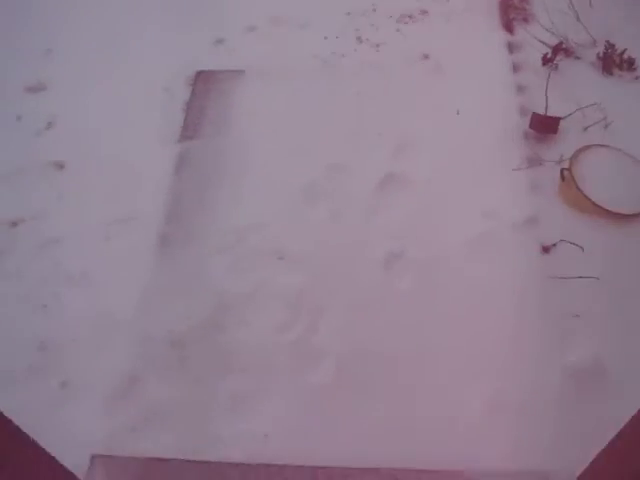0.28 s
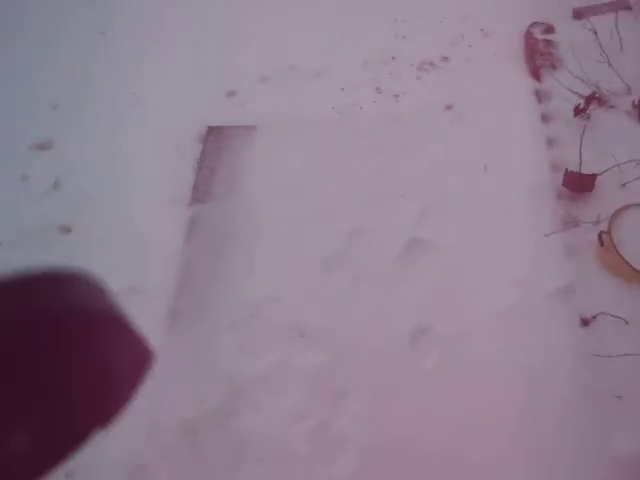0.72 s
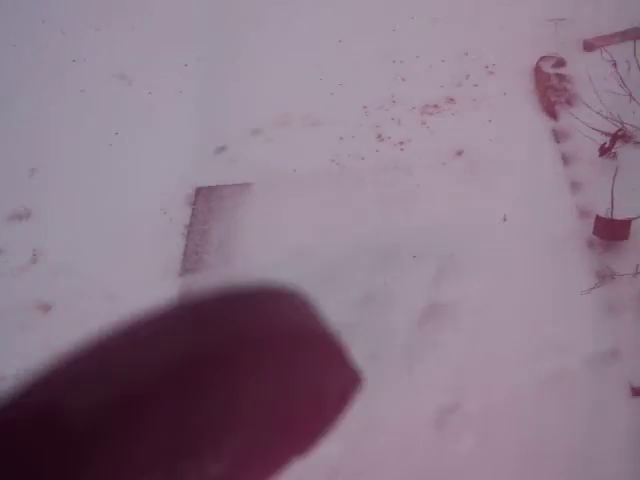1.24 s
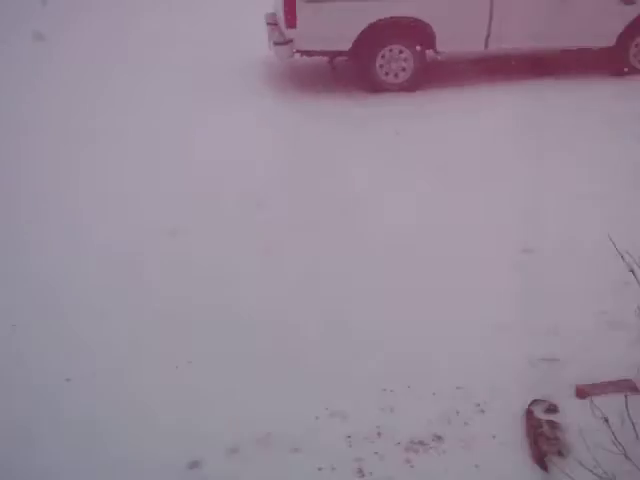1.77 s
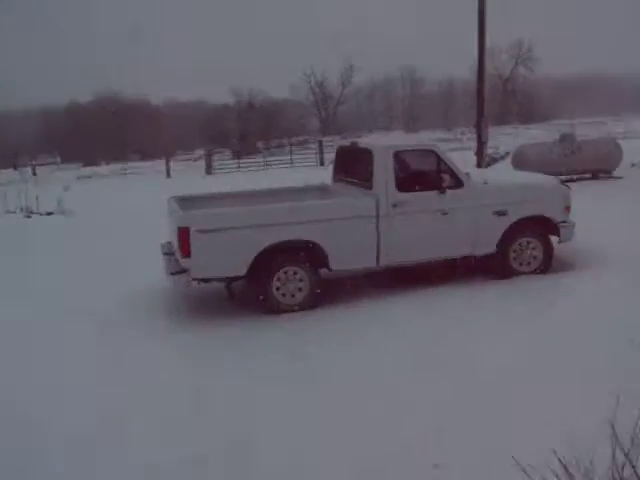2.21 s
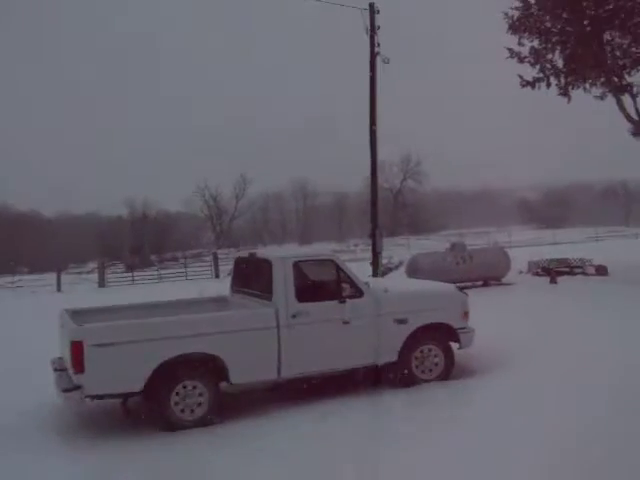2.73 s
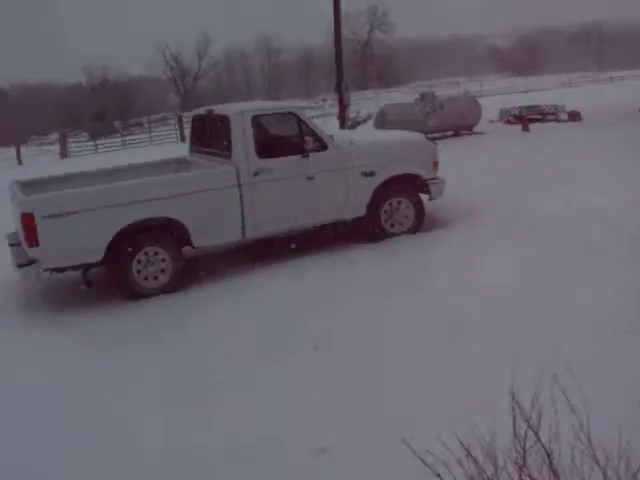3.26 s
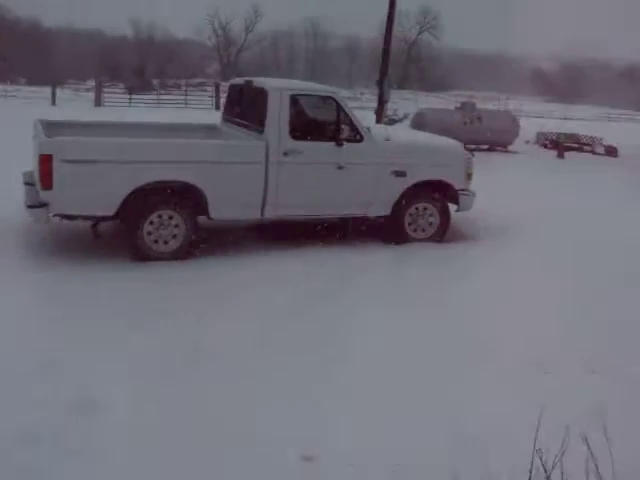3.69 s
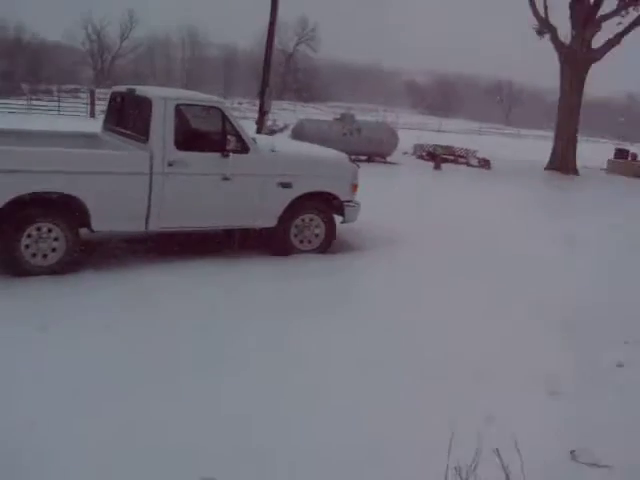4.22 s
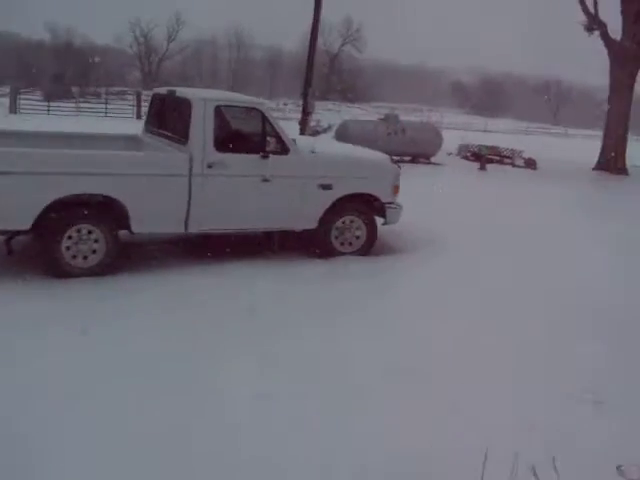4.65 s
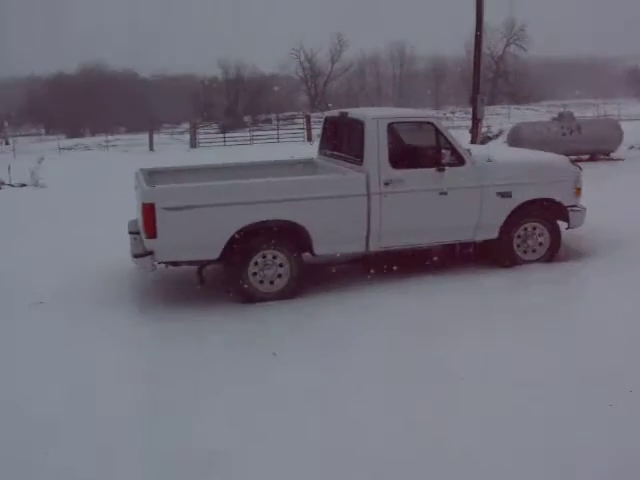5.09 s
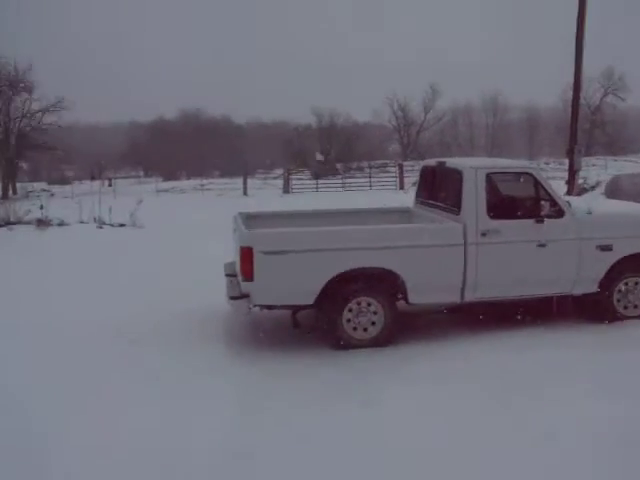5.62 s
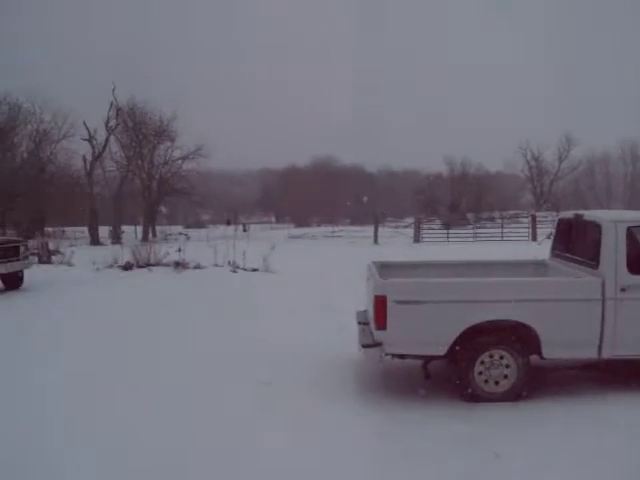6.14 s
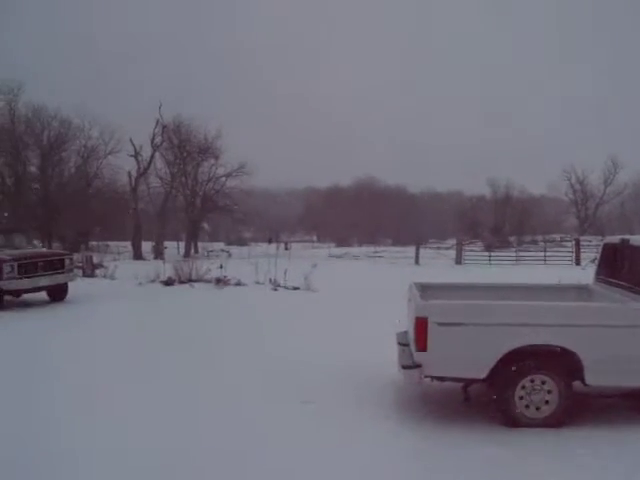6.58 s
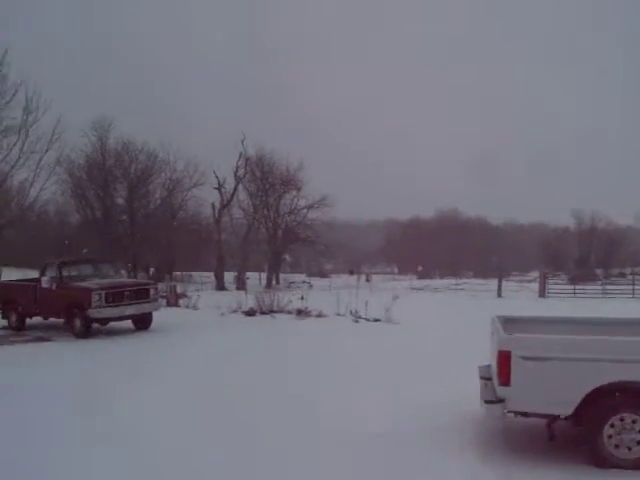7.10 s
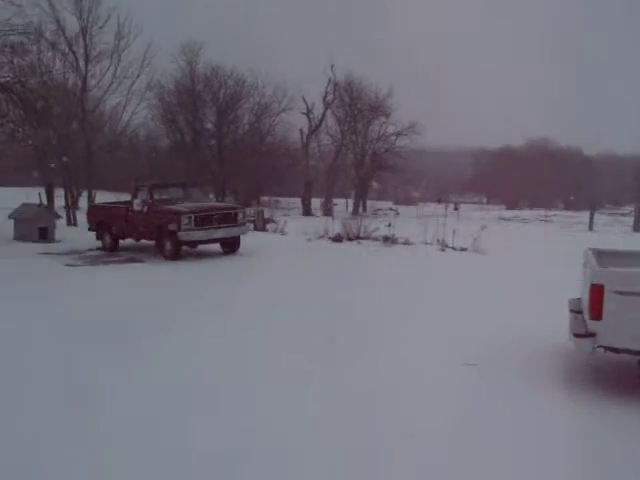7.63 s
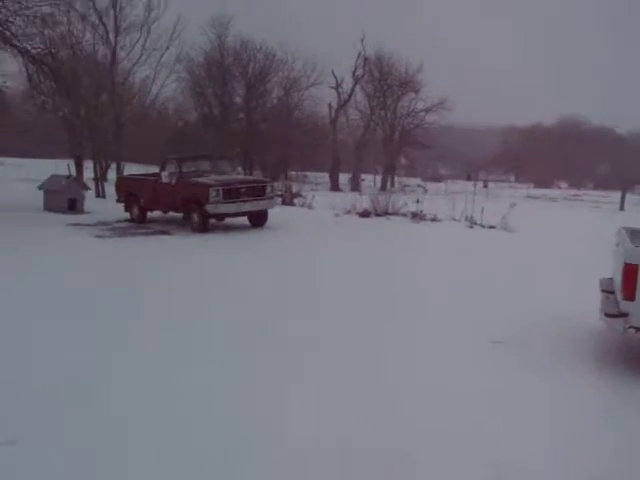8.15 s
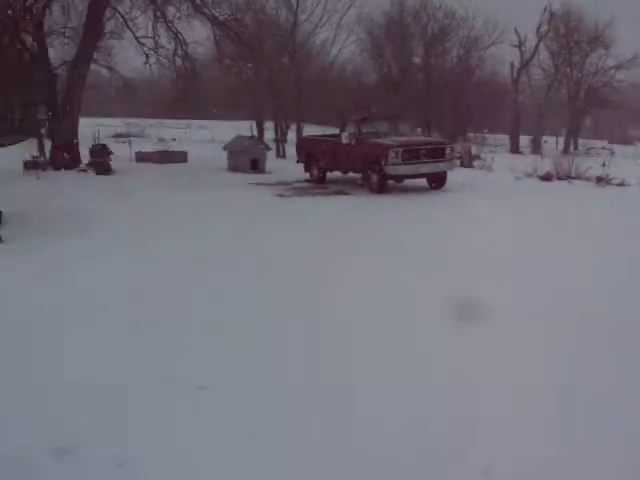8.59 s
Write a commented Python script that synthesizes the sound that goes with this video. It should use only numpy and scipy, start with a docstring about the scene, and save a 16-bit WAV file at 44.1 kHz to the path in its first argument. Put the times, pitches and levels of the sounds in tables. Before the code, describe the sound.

Outdoors in still winter air with a faint far drone, someone walks on crusted snow, heard close on a handheld microphone. Loose grains crunch, ice snaps sharply, and boots thud and scrape in uneven clusters. From about two seconds the hand squeaks and knocks on the casing, the hardest knocks distorting. Later the steps grow lighter and finer, with faint rising chirps, perhaps a small bird.

```python
"""In still air with a faint, far drone, someone starts to walk over crusted snow, a small device in hand.
From the start loose grains crunch and packed snow rumbles under each tread, and the icy crust snaps;
soon boots thud and scrape. All are random runs of tiny fractures, filtered into ranges of pitch.
From about 2 s the hand squeaks and knocks on the case: rough tones and short rings, the hardest overloading
the microphone. From 5 s faint, high chirps glide upward, perhaps a small bird."""
import sys
import numpy as np
from scipy import signal
from scipy.fft import rfft, irfft
from scipy.io import wavfile

SR = 44100
rng = np.random.default_rng(int(sys.argv[2]) if len(sys.argv) > 2 else 0)


def inscribe(sig):
    """Save sig as 16-bit PCM at rate SR to the path in sys.argv[1].

    A 1-D sig is mono; a 2-D sig holds one channel per row.
    Samples are clipped to [-1, 1] before scaling.
    """
    pcm = np.round(np.clip(np.atleast_2d(sig).T, -1, 1) * 32767)
    wavfile.write(sys.argv[1], SR, pcm.astype(np.int16))


N = 390726

# ranges in which snow sounds, from packed mass down to the finest ice: (low_hz, high_hz)
BOOM, THUMP, KNOCK = (45, 135), (120, 270), (250, 560)
THOCK, CRACK, CRISP, SIZZLE = (480, 1550), (1400, 2950), (2800, 4900), (4300, 7200)
ICE = [THOCK, CRACK, CRISP, SIZZLE]


def from_db(db):
    """Decibels become a plain multiplier."""
    return 10 ** (np.asarray(db) / 20)


def rms_one(x):
    """Scale a sound so that its average strength (rms) is 1."""
    return x / np.sqrt(np.mean(x ** 2) + 1e-20)


def add(out, start_s, piece):
    """Mix a short sound in at its starting time."""
    i = int(np.clip(round(start_s * SR), 0, N))
    out[i:i + len(piece)] += piece[:N - i]


def band_pass(x, edges_hz):
    """Keep only what lies between two pitches."""
    return signal.sosfilt(signal.butter(3, edges_hz, "band", fs=SR, output="sos"), x)


def ring_at(x, hz, sharpness):
    """What a single resonance gives back; a sharper one is narrower and rings longer."""
    return signal.lfilter(*signal.iirpeak(hz, sharpness, fs=SR), x)


def resonate(x, modes):
    """Resonances lift or hollow a few narrow ranges, one after another."""
    for hz, width_hz, db in modes:
        x = x + (from_db(db) - 1) * ring_at(x, hz, hz / width_hz)
    return x


def sine(pitch_hz):
    """A pure tone that follows a changing pitch."""
    return np.sin(2 * np.pi * np.cumsum(pitch_hz) / SR)


def at_hz(points, hz):
    """Read a spectrum curve on a logarithmic pitch axis."""
    points_hz, db = np.transpose(points)
    return np.interp(np.log(hz), np.log(points_hz), db)


def drift(rate, size):
    """A random wander of spread about 1 with `rate` new values a second."""
    at = np.arange(size) * rate / SR
    values = rng.standard_normal(int(at[-1]) + 2)
    return 1.19 * np.interp(at, np.arange(len(values)), values)


def grains(per_s, spread_db, size):
    """Tiny fractures at random moments, most weak and a few strong, over a trace of noise; rms 1."""
    strength = from_db(spread_db * np.minimum(rng.exponential(1, size), 4))
    clicks = (rng.random(size) < per_s / SR) * strength * rng.choice([-1, 1], size)
    return rms_one(clicks + 1e-3 * rng.standard_normal(size))


def slab(force, edges_hz, sharpness=11, ring_db=5):
    """Every piece of crust has its own size, and so rings briefly at a pitch of its own."""
    hz = np.exp(rng.uniform(*np.log(edges_hz)))
    return force + from_db(ring_db) * ring_at(force, hz, sharpness)


def bursts(events, ranges, force, slopes, colour_db):
    """Each event is a run of fractures, force(t, length), loudest in the range nearest to its pitch."""
    out = np.zeros(N)
    centres_hz = np.sqrt(np.prod(ranges, axis=1))
    below, above = slopes   # dB per octave lost below and above the pitch
    for start_s, length_s, db, pitch_hz in events:
        t = np.arange(int((3 * length_s + 0.044) * SR)) / SR
        octaves = np.log2(centres_hz / pitch_hz)
        shares = from_db(np.minimum(below * octaves, -above * octaves))
        gains = from_db(db + np.array(colour_db)) * shares / np.linalg.norm(shares)
        for edges_hz, gain in zip(ranges, gains):
            piece = band_pass(slab(force(t, length_s), edges_hz), edges_hz)
            # equal energy for events of equal length, before the gain
            piece = piece * np.sqrt(length_s * SR / np.sum(piece ** 2))
            add(out, start_s, rng.choice([-1, 1]) * gain * piece)
    return out


def still_air(level_db=-48, trim_db=-2):
    """A smooth, even background: noise shaped by a fixed spectrum."""
    # colour of the air, relative: pitch_hz [Hz], level_db [dB per Hz]
    air_colour = [(15, -28.5), (25, 0), (164, -3), (199, -26.5), (260, -5.5), (357, -26.5), (554, -14.5),
                  (641, -10.5), (1180, -21.5), (8500, -29.5), (11000, -62.5), (18700, -120)]
    hz = np.fft.rfftfreq(N, 1 / SR) + 1   # 1 Hz up, to avoid the logarithm of zero
    spectrum = rfft(rng.standard_normal(N)) * from_db(at_hz(air_colour, hz))
    return from_db(level_db + trim_db) * rms_one(irfft(spectrum, N))


def far_drone():
    """A faint, wavering drone from far away: noise through a few narrow resonances."""
    # unsteady tones: pitch_hz [Hz], width_hz [Hz], level_db [dB]
    tones = [(59, 9, -59), (112.7, 9.4, -59.5), (310, 45, -56), (437.6, 30, -59.5)]
    out = np.zeros(N)
    for hz, width_hz, db in tones:
        out += from_db(db) * rms_one(ring_at(rng.standard_normal(N), hz, hz / width_hz))
    return out


def underfoot():
    """Strength in dB of coarse grains, fine grains and rumble: every tread swells, holds and fades."""
    # a boot presses into the snow: start_s [s], hold_s [s, swell included], then strengths before mixing:
    # coarse_db [dB], fine_db [dB], rumble_db [dB]
    treads = [(0,0.22,-49.5,-67,-54), (0.343,0.097,-36,-39,-35.5), (0.482,0.085,-39,-45,-43),
              (0.88,0.25,-51.5,-51,-57), (1.065,0.12,-36.5,-30,-37.5), (1.25,0.067,-34.5,-32,-44),
              (1.601,0.3,-39.5,-40.5,-46), (1.976,.13,-36.5,-39,-51), (2.099,0.28,-37,-36.5,-44),
              (2.424,0.17,-39,-46,-44), (2.927,0.11,-46.5,-39,-50.5), (3.055,0.22,-37.5,-45,-44.5),
              (3.327,0.22,-43,-43,-45.5), (3.64,0.25,-41.5,-48,-60), (4.152,0.13,-48,-50,-61),
              (4.399,0.026,-36.5,-39,-37), (4.508,0.1,-33,-32,-47.5), (4.685,0.29,-35.5,-30.5,-52),
              (4.993,0.083,-36.5,-51,-38), (5.182,0.21,-48,-42,-57.5), (5.56,0.091,-47.5,-44,-53),
              (5.701,0.061,-41.5,-40,-46), (5.869,0.2,-38,-38.5,-48.5), (6.159,0.048,-43.5,-41.5,-47),
              (6.437,0.16,-59,-37.5,-69), (6.617,0.22,-46,-33.5,-50), (6.915,0.13,-44.5,-37,-57),
              (7.098,0.066,-41.5,-36,-55), (7.353,0.047,-57,-38.5,-50), (7.694,0.027,-51,-34.5,-57),
              (8.595,0.057,-41,-46,-55), (8.647,0.034,-47,-40,-58)]
    # faint, fine rustle between the treads, strength before mixing: time_s [s], fine_db [dB]
    rustle = [(0, -46.5), (1.5, -42), (2.8, -48.5), (3.6, -45.5), (5.4, -49), (6.3, -49.5), (7.25, -46.5),
              (7.62, -51), (8.4, -59), (8.85, -56)]
    press_s, release_db_per_s = 0.024, 132
    rest_coarse_db, rest_rumble_db = -55, -55.5   # a faint, steady level that stays between the treads
    t = np.arange(0, N, 40) / SR
    rustle_db = np.interp(t, *np.transpose(rustle))
    power = from_db([rest_coarse_db + 0 * t, rustle_db, rest_rumble_db + 0 * t]) ** 2
    for start_s, hold_s, *levels_db in treads:
        swell = np.clip((t - start_s) / press_s, 0, 1)
        fade = from_db(-release_db_per_s * np.maximum(t - start_s - hold_s, 0))
        power = power + np.outer(from_db(levels_db), swell * fade) ** 2
    every_sample_s = np.arange(N) / SR
    return [np.interp(every_sample_s, t, 10 * np.log10(p)) for p in power]


def avalanches(per_s=110, spread_db=8.0, fade_s=0.0043):
    """Small collapses that start at once and die away; rms 1."""
    starts = (rng.random(N) < per_s / SR) * from_db(spread_db * np.minimum(rng.exponential(1, N), 3))
    return rms_one(signal.lfilter([1], [1, -np.exp(-1 / (fade_s * SR))], starts + 1e-18))


def loose_snow(coarse_db, fine_db, patchy_db=3.5, clumps_from_db=-35):
    """Grains rub and crunch: smoothly under a light touch, in avalanches under load."""
    # colour of the coarse grains, relative: pitch_hz [Hz], level_db [dB per Hz]
    coarse_colour = [(400, -15.5), (560, -4), (1200, 0), (2300, -1.5), (3500, -9.5), (5000, -16.5),
                     (8000, -25.5)]
    # colour of the fine grains, relative: pitch_hz [Hz], level_db [dB per Hz]
    fine_colour = [(400, -26), (1100, -21.5), (1700, -8), (2500, -9), (3400, -1.5), (4100, -4), (5000, -7),
                   (5800, -12.5), (6600, -19.5), (8000, -36)]
    coarse, fine = from_db(coarse_db - 30), from_db(fine_db - 32)   # relative heights of the spectra
    clumped = 1 / (1 + from_db(clumps_from_db - coarse_db) ** 2)   # 0 is smooth, 1 is all avalanches
    slide = np.sqrt(1 - clumped + clumped * avalanches() ** 2)
    # two runs of grains serve neighbouring bands in turn
    forces = [slide * grains(9000, 4.0, N) * np.sqrt(SR / 2) for _ in range(2)]
    out, edges_hz = np.zeros(N), np.geomspace(430, 8600, 27)
    for k, (low, high) in enumerate(zip(edges_hz, edges_hz[1:])):
        hz = np.sqrt(low * high)
        coarse_height = coarse * from_db(at_hz(coarse_colour, hz))
        fine_height = fine * from_db(at_hz(fine_colour, hz))
        patches = from_db(patchy_db * drift(35, N))   # each band comes and goes on its own
        out += np.hypot(coarse_height, fine_height) * patches * band_pass(forces[k % 2], (low, high))
    return from_db(-0.26) * out


def ice_ticks(fine_db, per_s=45, relative_db=-11):
    """Single crystals break with a tiny tick among the finer grains."""
    return from_db(fine_db + relative_db) * rms_one(band_pass(grains(per_s, 5.2, N), (2100, 5600)))


def rumble(weight_db, lump_db=3.5):
    """Packed snow settles under the walker's weight: sparse, low fractures that come in lumps."""
    out = np.zeros(N)
    for edges_hz, relative_db in [(BOOM, -7), (THUMP, -6), (KNOCK, -4.5)]:
        settling = rms_one(band_pass(grains(1500, 3.3, N), edges_hz))
        out += from_db(weight_db + relative_db + lump_db * drift(45, N)) * settling
    return from_db(0.04) * out


def snap(t, length, first_db=13, fade_db=21, tail_db=-20, tail_db_per_s=750):
    """One sharp break, a quickly dying shower of smaller ones, and a faint tail off the ground."""
    shower, tail = from_db(-fade_db * t / length), from_db(tail_db - tail_db_per_s * t)
    force = grains(9000, 5.2, len(t)) * (shower + tail)
    force[0] += from_db(first_db)
    return force


def crackles(coarse_db, fine_db, per_s=22, relative_db=-2, spread_db=2.5, low_hz=1496, high_hz=4980):
    """Lesser breaks at random, as (s, dB, Hz): low ones follow the coarse crunch, bright ones the fine."""
    when, smallness, luck = rng.random((int(per_s * N / SR), 3)).T
    i = (when * N).astype(int)
    around_db = (1 - smallness) * coarse_db[i] + smallness * fine_db[i]
    db = around_db + relative_db + spread_db * (2 * luck - 1)
    return list(zip(i / SR, db, low_hz * (high_hz / low_hz) ** smallness))


def crust_snaps(coarse_db, fine_db):
    """The icy top layer snaps and crackles; low slabs take longer to break than bright ones."""
    # the crust breaks: start_s [s], level_db [dB before colouring], pitch_hz [Hz]
    breaks = [(.0323,-31.5,2520), (.1047,-27,1250), (.1607,-22.5,1900), (.3133,-33.5,1310),
              (.4457,-22,3600), (.4579,-25.5,1290), (.5542,-26,1130), (.565,-31,1100), (.6194,-26.5,1220),
              (.6727,-38.5,950), (.8117,-27,1740), (.9478,-32.5,1310), (.9716,-25,1700), (1.0798,-15,3150),
              (1.159,-27,3800), (1.181,-15,4100), (1.193,-27.5,1200), (1.2509,-18.5,2400),
              (1.2702,-16.5,2450), (1.2911,-19,3200), (1.432,-16.5,4960), (1.4493,-11,5300),
              (1.4851,-35.5,1190), (1.658,-19.5,4000), (1.6691,-27,1200), (1.7333,-24,1300),
              (1.7872,-14,4450), (1.8258,-26,3300), (1.842,-27,2000), (1.8624,-20,2860),
              (1.9135,-20.5,5000), (1.9498,-20,4500), (2.0905,-24.5,2400), (2.1336,-13.5,4050),
              (2.1823,-23,4300), (2.2385,-20,2300), (2.301,-17.5,2950), (2.3215,-23.5,1370),
              (2.3546,-29,3030), (2.5973,-24,2200), (2.941,-31,3900), (3.04,-31,1100), (3.1012,-30,1000),
              (3.1385,-28.5,1500), (3.2928,-23,4170), (3.3735,-20.5,2010), (3.4662,-27.5,1330),
              (3.514,-32.5,1100), (3.6393,-20.5,3000), (4.111,-34,2600), (4.1598,-17.5,3360),
              (4.1907,-19,3700), (4.3771,-28.5,1440), (4.476,-21,2040), (4.5218,-22.5,3030),
              (4.5458,-18,2850), (4.6734,-16,2920), (4.708,-16.5,1950), (4.7657,-15.5,3080),
              (4.9079,-19.5,1860), (5.0017,-16.5,2000), (5.1278,-19.5,1410), (5.178,-20.5,6000),
              (5.3414,-23,4400), (5.3937,-28,2280), (5.4251,-26.5,4320), (5.5152,-25.5,1270),
              (5.7006,-31.5,950), (5.7596,-21,3100), (5.8338,-30,2670), (5.8778,-28,3700),
              (5.9117,-22,3770), (6.0826,-37.5,1510), (6.4,-31.5,4200), (6.5353,-21,4400),
              (6.5949,-28.5,1200), (6.7658,-28,3940), (6.7963,-23.5,3900), (6.9629,-27,3430),
              (7.3676,-27.5,2930), (7.4674,-32.5,3900), (7.5816,-31.5,1130), (7.62,-31.5,4200),
              (7.7549,-32,2500), (7.8254,-30.5,4200), (7.8918,-25.5,4520), (7.9273,-33,4360),
              (8.0531,-38,1220), (8.195,-41,1390), (8.582,-34.5,1210)]
    cycles = 16   # length of a break, in periods of its pitch
    events = [(s, cycles / hz, db, hz) for s, db, hz in list(breaks) + crackles(coarse_db, fine_db)]
    return bursts(events, ICE, snap, slopes=(12.3, 15.8), colour_db=(1, -2, -4.5, -6.5))


def thud(t, length, rise_s=0.0012, fade_db=7, release_s=0.0047, first_db=12):
    """The heel lands, then the snow gives way in a few lumps."""
    push = (1 - np.exp(-t / rise_s)) * from_db(-fade_db * t / length)
    push = push * np.exp(-np.maximum(t - length, 0) / release_s)
    force = push * grains(1100, 4.4, len(t))
    force[0] += from_db(first_db)
    return force


def boot_thuds():
    """Dull blows as weight lands: low-pitched runs of fractures."""
    # blows: start_s [s], length_s [s], level_db [dB before colouring], pitch_hz [Hz]
    blows = [(.363,0.017,-22.5,192), (.405,0.023,-29,170), (1.077,0.021,-18,160), (1.08,0.01,-25,560),
             (1.101,0.019,-19,400), (1.14,0.048,-34.5,330), (1.432,.02,-34,560), (1.66,.016,-28.5,160),
             (1.722,.05,-28.5,216), (1.755,0.019,-31,620), (1.86,.03,-36,140), (2.01,0.018,-31,170),
             (2.352,0.016,-25.5,233), (2.383,0.014,-21,219), (3.428,0.017,-30,520), (3.47,0.058,-34.5,109),
             (3.8,0.013,-26,620), (3.814,0.018,-18,460), (3.829,0.024,-18.5,456), (3.864,0.019,-24.5,400),
             (3.896,0.011,-24.5,480), (4.16,0.0083,-25,600), (4.365,0.036,-31.5,417), (5.045,0.031,-45,330)]
    ranges = [BOOM, THUMP, KNOCK, THOCK]
    return bursts(blows, ranges, thud, slopes=(8.2, 6.1), colour_db=(-3, -1.5, -1, -2))


def scuff(t, length, rise_s=0.00045, release_s=0.0088):
    """Grains break in clumps while the sole moves, then die away."""
    push = (1 - np.exp(-t / rise_s)) * np.exp(-np.maximum(t - 0.75 * length, 0) / release_s)
    return push * grains(6000, 5.9, len(t)) * from_db(0.53 * drift(260, len(t)))


def sole_scuffs():
    """A sole grinds over the crust: short scrapes of breaking grains."""
    # scrapes: start_s [s], length_s [s], level_db [dB before colouring], pitch_hz [Hz]
    scrapes = [(.425,0.044,-34,2880), (.492,0.018,-29.5,895), (1.168,0.017,-22,4400),
               (1.222,0.008,-26,1300), (1.31,0.024,-15,2500), (1.345,.012,-19,2900), (1.358,0.0066,-26,906),
               (1.548,0.028,-26,3200), (1.75,0.046,-23.5,1700), (1.788,0.013,-20,4100),
               (1.994,0.021,-22.5,2160), (2.305,0.045,-26,2960), (2.468,0.048,-23.5,1670),
               (2.635,0.011,-27,910), (2.659,0.0095,-20,2120), (2.684,0.011,-24,1800),
               (3.262,0.0087,-32,1600), (3.325,0.017,-28.5,2100), (3.426,0.019,-24,1310),
               (3.855,0.021,-22.5,1520), (4.277,0.03,-26,2560), (4.427,0.01,-27,2200),
               (4.447,0.032,-21,2230), (4.53,0.074,-25,2820), (4.648,0.01,-25,1600), (4.72,0.096,-23,3170),
               (4.91,0.1,-25.5,2010), (5.028,0.019,-21.5,3080), (6.0,0.013,-29,1650),
               (6.622,0.028,-25.5,3960), (6.645,0.047,-21.5,4000), (6.73,.014,-23.5,3700),
               (6.972,.044,-25.5,2860), (7.395,0.041,-30,3460), (7.523,0.042,-25.5,3800),
               (7.722,0.036,-23.5,3740), (8.49,0.019,-39.5,3900)]
    return bursts(scrapes, ICE, scuff, slopes=(10.7, 14), colour_db=(0, -3.5, -2.5, -7))


def case_squeaks(pitch_hz=3900, waver=0.089, rough_db=7.0, rasp_db=-4):
    """The grip sticks and slips on the case: a rough, wavering tone that swells and stops short."""
    # slips: start_s [s], length_s [s, slightly extended below], level_db [dB]
    slips = [(1.947, 0.013, -14), (3.65, 0.012, -18), (3.6612, 0.0045, -15), (4.311, 0.017, -18),
             (4.852, 0.0077, -17)]
    out = np.zeros(N)
    for start_s, length_s, db in slips:
        size = int((length_s + 0.0031) * SR)
        tone = sine(pitch_hz * (1 + waver * drift(700, size)))
        rasp = rms_one(band_pass(rng.standard_normal(size), (1500, 4800)))
        rough = from_db(rough_db * drift(735, size)) * signal.windows.tukey(size, .4)
        add(out, start_s, from_db(db) * rms_one((tone + from_db(rasp_db) * rasp) * rough))
    return out


def case_knocks(detune=0.055):
    """Knocks ring all modes of the case, each with its own strength and brightness; pitches waver at random."""
    # knocks on the case: start_s [s], strength_db [dB], brightness_db [dB per octave above 3000 Hz]
    knocks = [(1.9492, -18, 11.5), (3.6462, 8, 0), (4.1719, 6, 6), (4.2985, 10, 2), (4.6729, -7.5, -2),
              (4.8515, 3, -3)]
    # what the case rings with: pitch_hz [Hz], level_db [dB, relative], t60_s [s to fall by 60 dB]
    case_modes = [(424, -21.5, 0.0077), (945, -19, 0.01), (1760, -14.5, 0.0046), (2310, -4.5, 0.015),
                  (3636, -8, 0.017), (4390, -5.5, 0.0077), (5600, -16.5, 0.016), (6750, -11, 0.0044)]
    out, t = np.zeros(N), np.arange(int(.04 * SR)) / SR
    for start_s, strength_db, bright_db in knocks:
        for hz, db, t60_s in case_modes:
            level_db = strength_db + db + bright_db * np.log2(hz / 3000) + rng.normal(0, 1)
            tone = sine(hz * (1 + detune * drift(400, len(t))))
            add(out, start_s, from_db(level_db - 60 * t / t60_s) * tone * rng.choice([-1, 1]))
    return out


def sympathy(x):
    """Thin, lightly damped parts inside the device store a little of each jolt and give it back slowly."""
    # parts that sing on: pitch_hz [Hz], level_db [dB], t60_s [s to fall by 60 dB]
    parts = [(2040, -4, 0.35), (2570, -0.5, 0.8), (4770, -5.5, 0.8)]
    return sum(from_db(db) * ring_at(x, hz, np.pi * hz * t60_s / np.log(1000)) for hz, db, t60_s in parts)


def chirps(length_s=.047, rise_hz=1100):
    """Thin, nearly pure upward glides that swell and fade."""
    # rising chirps: start_s [s], starting_pitch_hz [Hz], peak_level_db [dB]
    glides = [(5.05, 6300, -49), (5.525, 6000, -46), (6.07, 6300, -67), (6.205, 6300, -53),
              (7.148, 6350, -68), (7.785, 6450, -54), (7.9, 6450, -54), (8.025, 6280, -57),
              (8.105, 7060, -54), (8.135, 6700, -63), (8.208, 6200, -56)]
    out, progress = np.zeros(N), np.linspace(0, 1, int(length_s * SR))
    for start_s, hz, db in glides:
        tone = sine(hz + rise_hz * progress + 45 * drift(300, len(progress)))
        add(out, start_s, from_db(db) * np.sin(np.pi * progress) * tone)
    return out


def scene():
    """Boots and snow reach the microphone through its cavity; the case sounds straight into it."""
    # low resonances of the ground underfoot: pitch_hz [Hz], width_hz [Hz], change_db [dB]
    ground = [(105, 17, 4.5), (203.7, 18, 5.5), (290, 33, 1), (344, 100, -2), (455, 110, 2)]
    # cavity resonances in front of the microphone: pitch_hz [Hz], width_hz [Hz], change_db [dB]
    cavity = [(340, 50, 5.5), (1050, 78, -4), (1182, 45, 2.5), (1350, 37, 1.5), (1694, 640, -3.5),
              (2303, 235, 3.5), (2650, 510, -1), (3630, 600, 4), (4840, 67, -1.5)]
    background = still_air() + far_drone() + chirps()
    coarse_db, fine_db, weight_db = underfoot()
    snow = loose_snow(coarse_db, fine_db) + ice_ticks(fine_db)
    crust = crust_snaps(coarse_db, fine_db) + sole_scuffs()
    boots = resonate(rumble(weight_db) + boot_thuds(), ground)
    case = case_squeaks() + case_knocks()
    near = resonate(boots + snow + crust, cavity) + case
    return (near + sympathy(near) + background)[None]


def record(dry, headroom=0.71):
    """The hardest knocks saturate; little above 8 kHz is kept, and overshoots are clipped."""
    rounded = dry / (1 + (dry / headroom) ** 4) ** (1 / 4)
    dulled = signal.sosfilt(signal.cheby1(9, .3, 8000, fs=SR, output="sos"), rounded)
    clipped = np.clip(dulled, -.73, .73)
    # the treble that clipping adds is cut above 16400 Hz
    return signal.sosfilt(signal.cheby1(12, .2, 16400, fs=SR, output="sos"), clipped)


dry = scene()
out = record(dry)
inscribe(out)
```